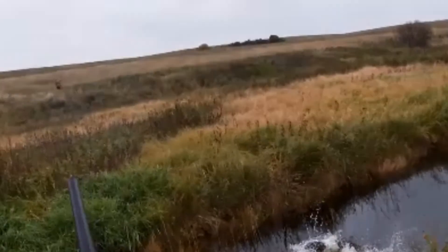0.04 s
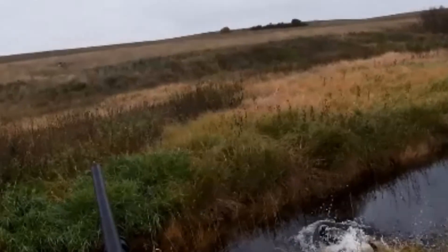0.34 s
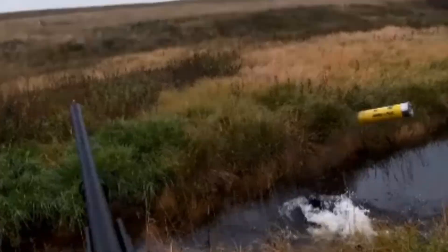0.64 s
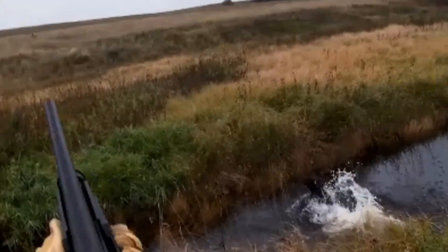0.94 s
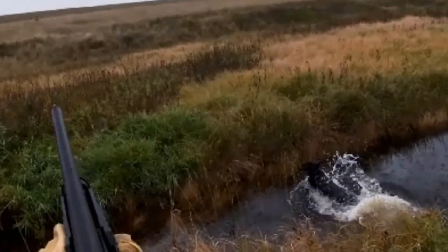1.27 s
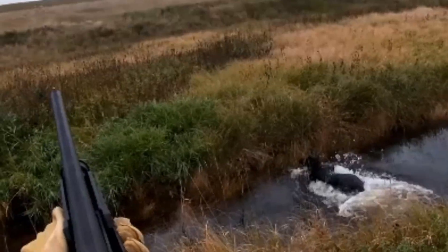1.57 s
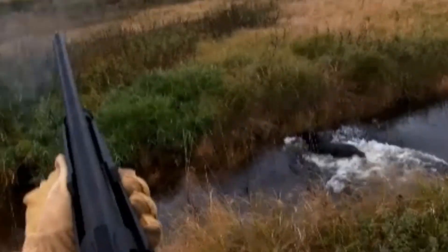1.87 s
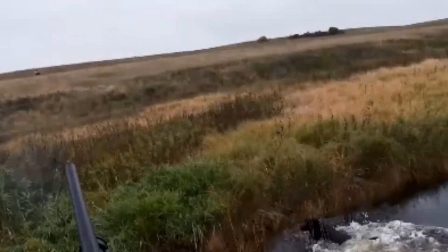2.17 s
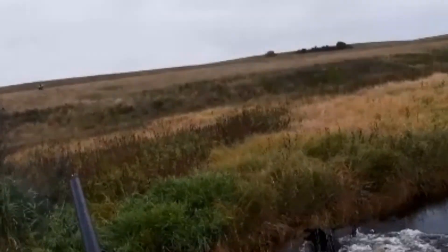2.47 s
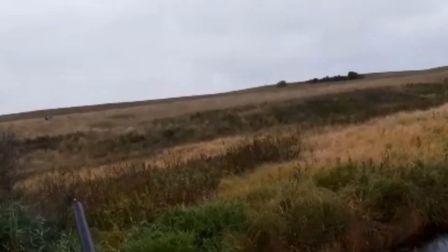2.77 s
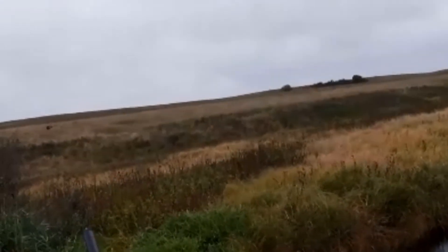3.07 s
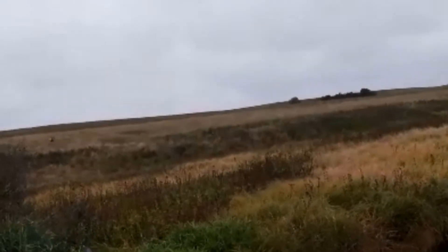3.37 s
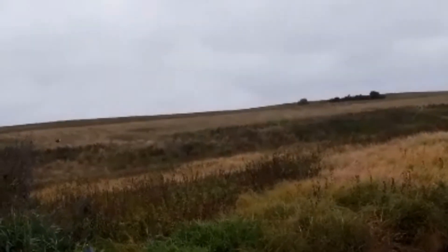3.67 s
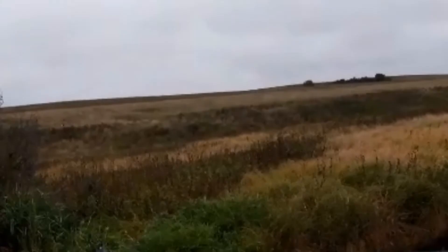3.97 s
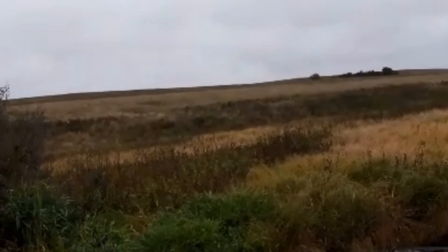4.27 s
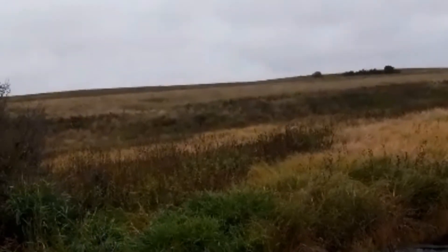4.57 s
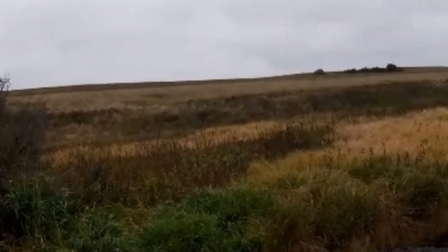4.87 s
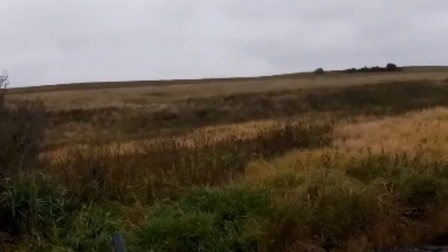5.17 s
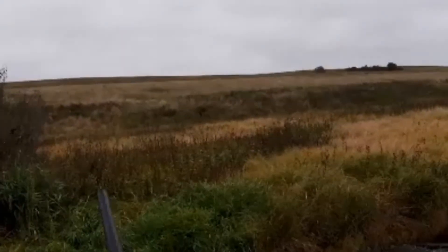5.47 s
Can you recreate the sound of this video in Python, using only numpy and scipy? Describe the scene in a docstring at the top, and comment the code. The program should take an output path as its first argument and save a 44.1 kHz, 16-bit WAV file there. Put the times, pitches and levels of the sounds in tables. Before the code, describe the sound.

Close shotgun pump clacks, one echoing blast and another quick rack in windy open grassland, with a dog faintly splashing.

```python
"""Open grassland above a creek: a pump shotgun is racked, fired and racked again beside a muffled camera.
The slide scrapes along its rails, knocks against its stops and leaves the steel ringing. Each shot is a
blast of noise that rolls back off the land, a hillside answering last; an earlier one is still dying away
at first. Recoil and slide thud through the camera, wind eddies buffet the microphone, and a dog
faintly churns up spray and bubbles in the creek below."""
import sys
import numpy as np
from scipy import signal
from scipy.fft import rfft, irfft, next_fast_len
from scipy.io import wavfile
from scipy.ndimage import uniform_filter1d

SR = 44100
rng = np.random.default_rng(int(sys.argv[2]) if len(sys.argv) > 2 else 0)


def materialize(psi):
    """Save the field psi as 16-bit PCM at rate SR to the path in sys.argv[1].

    A 1-D psi becomes a single channel; in a 2-D psi each row is a channel.
    """
    bounded = np.clip(np.atleast_2d(psi).T, -1, 1)
    quanta = np.round(bounded * 32767).astype(np.int16)
    wavfile.write(sys.argv[1], SR, quanta)


N = 243643
T = np.arange(N) / SR
HZ = np.fft.rfftfreq(next_fast_len(N, True), 1 / SR)
MODE_WIDTH_HZ = 78  # width of the peaks that a contact picks out
CONTACT_S, LEAD_S = 0.0014, 0.012  # attack of steel on steel; pre-roll ahead of each knock

# The wind bed, with one deep lull. Each row: time in seconds, rumble in dB, buffeting in dB.
BREEZE = [(0, -41, -38.5), (.45, -40, -47.5), (.85, -43, -42), (1.15, -33, -48.5), (1.35, -47.5, -51.5),
          (2.1, -32.5, -39), (2.32, -39, -53), (2.6, -35, -36.5), (2.85, -48.5, -51.5), (3.1, -34, -38),
          (3.42, -35, -55.5), (3.7, -45, -70), (3.95, -40.5, -68.5), (4.05, -60.5, -78), (4.25, -52.5, -64),
          (4.35, -47, -50), (5.15, -36.5, -46.5), (5.52, -51.5, -50.5)]
# Gusts thumping the microphone. Each row: peak in seconds, rumble in dB, buffeting in dB,
# length in seconds.
GUSTS = [(0.063, -48, -29.5, 0.036), (0.234, -31, -46, 0.08), (1.034, -23.5, -35.5, 0.17),
         (1.082, -46, -29.5, 0.033), (1.289, -30.5, -37, 0.018), (1.407, -31.5, -39, 0.024),
         (1.491, -34, -34, 0.071), (1.668, -38.5, -28, 0.026), (2.174, -37, -39, 0.052),
         (2.431, -28.5, -23, 0.034), (2.524, -33, -35.5, 0.15), (3.079, -40, -25.5, 0.026),
         (3.232, -24.5, -37.5, 0.045), (3.559, -36.5, -40.5, 0.15), (3.824, -33, -73.5, 0.027),
         (4.373, -38, -36.5, 0.12), (4.667, -36, -49.5, 0.15), (4.748, -37, -28, 0.03),
         (5.05, -27, -42.5, 0.034), (5.096, -35, -38.5, 0.044)]
# EQ curves of the large and the small eddies. Each row: frequency in Hz, gain in dB.
RUMBLE_EQ = [(8, -4.5), (22, 9), (45, 3.5), (68, -0.5), (92, -31.5), (200, -64), (500, -96.5), (2000, -130)]
BUFFET_EQ = [(40, -18), (85, 6.5), (110, 2.5), (165, -10), (210, -16), (300, -31.5), (500, -45.5),
             (1200, -84.5), (4000, -120)]
# Hollow hums in the wind. Each row: peak in seconds, pitch in Hz, level in dB, length in seconds.
HUMS = [(2.705, 235, -53, 0.1), (2.708, 403, -60, 0.11), (2.81, 231, -55.5, .06), (2.94, 226, -48, 0.066),
        (2.962, 400, -66.5, .07), (3.086, 309, -54.5, 0.031), (3.205, 227, -52.5, .11),
        (3.38, 230, -63, .06), (3.82, 222, -63, .06), (3.936, 230, -59, 0.068), (4.239, 222.5, -59.5, 0.12),
        (4.437, 251, -48.5, 0.043), (4.671, 388, -49.5, 0.11), (4.829, 426, -58, 0.13)]
# The dog's churning, fainter as it swims behind the bank. Each row: time in seconds, level in dB.
CHURN = [(0, -49), (.2, -47.5), (.28, -56), (.5, -63), (1.3, -61.5), (1.75, -58), (2.3, -62.5), (2.47, -69),
         (2.65, -66), (2.95, -71), (4.35, -70.5), (4.5, -67.5), (5.52, -60)]
# Splashes poking out of the churn. Each row: peak in seconds, level in dB, length in seconds.
SPLASHES = [(0.28, -67, .008), (0.34, -54.5, 0.027), (1.411, -64.5, 0.051), (1.625, -68, 0.093),
            (2.588, -60.5, 0.027), (2.705, -62.5, .025), (3.33, -68, 0.083), (3.45, -68.5, 0.044),
            (3.602, -68, 0.049), (4.48, -66, 0.067), (4.684, -67.5, 0.0077), (4.895, -62.5, 0.027),
            (4.952, -60.5, 0.059)]
# EQ curves of the water, the cloth and the ticks. Each row: frequency in Hz, gain in dB.
WATER_EQ = [(90, -15.5), (190, -12), (240, -3.5), (320, -9.5), (410, -10), (650, -14.5), (1000, -16),
            (1360, -16.5), (1750, -23), (2400, -23.5), (3000, -23), (3500, -32.5), (4300, -35.5),
            (4800, -49.5), (5700, -46.5), (6500, -55.5), (8500, -85.5)]
CLOTH_EQ = [(300, -23.5), (1000, -4.5), (1800, 2.5), (3000, 4.5), (4200, -10.5), (5000, -23), (6000, -21.5),
            (8000, -55)]
TICK_EQ = [(2000, -22.5), (5000, -16), (8000, -3.5), (9500, 0), (10300, 6.5), (11000, -22)]
# The rustle as the gun is lowered. One row: peak in seconds, level in dB, length in seconds.
RUSTLE = (3.985, -73, 0.3)
# Dry ticks in the top end. Each row: time in seconds, level in dB.
TICKS = [(.533, -61), (.618, -51), (.703, -49.5), (0.789, -60), (.917, -58), (1.002, -45.5), (1.087, -59),
         (1.172, -57.5), (1.513, -63.5), (1.813, -61), (1.855, -47.5), (1.94, -48.5), (1.985, -51.5),
         (2.068, -55), (2.11, -59), (2.238, -61.5), (2.408, -55.5), (2.452, -52.5), (2.537, -52),
         (2.58, -61.5), (2.707, -62), (3.006, -55), (3.134, -53), (3.177, -61.5), (3.219, -59.5),
         (3.603, -58), (3.816, -59), (4.37, -59.5), (4.669, -58.5), (4.754, -55), (4.968, -58),
         (5.181, -61), (5.266, -56), (5.309, -51), (5.352, -48.5)]
# Jolts through the shooter's body. Each row: peak in seconds, thud in dB, length in seconds,
# low-pass corner in Hz, boom of the stock in dB.
JOLTS = [(0.623, -33.5, 0.011, 80, -32), (0.65, -21, 0.052, 58, -36.5), (0.793, -43.5, .035, 80, -40),
         (0.993, -33, 0.033, 50, -41.5), (1.903, -12.5, 0.043, 54.8, -28),
         (1.977, -22.5, 0.07, 30.86, -38.5), (5.326, -43, .06, 80.5, -38), (5.373, -18.5, 0.017, 92, -35)]
# Steel shimmer after the action closes. Each row: start in seconds, level in dB, t60 in seconds.
SHIMMERS = [(.985, -51.5, 0.55), (5.365, -52.5, 0.65)]
# EQ curves of that shimmer and of the gun's steel and stock. Each row: frequency in Hz, gain in dB.
SHIMMER_EQ = [(600, -24.5), (1500, -7.5), (2800, 1.5), (3700, -4), (4400, -15.5), (5700, -18), (6500, -23),
              (7500, -44)]
GUN_EQ = [(120, -36.5), (250, -13.5), (390, -8), (520, -8.5), (650, -2), (850, -2.5), (1400, -5.5),
          (2300, -12), (3000, -9.5), (3350, -19), (3650, -14), (4150, -28.5), (5000, -34), (6200, -37.5),
          (7000, -49), (8500, -65)]
# Resonances of the gun. Each row: centre in Hz, width in Hz, boost in dB.
GUN_MODES = [(470, 130, 3), (1080, 77, -5), (2303, 98, -2.5), (3100, 130, 2.5), (3700, 120, 0),
             (4500, 330, 9.5), (5546, 380, 3)]
# Steel singing on after the slide stops. Each row: start in seconds, pitch in Hz, level in dB,
# t60 in seconds.
STEEL_NOTES = [(.984, 1990, -52, .26), (0.985, 2616, -58.5, 0.54), (0.986, 3337, -58, 0.78),
               (0.986, 3530, -56, 0.58), (0.984, 4762, -58, 0.42), (5.365, 1496, -57, 0.97),
               (5.365, 3000, -61, 0.36), (5.365, 3740, -57, .75)]
# Strokes of the slide. Each row: start and stop in seconds, level at the stop in dB, rattle t60 in
# seconds, rail pitch at the start and at the stop in Hz, rail level against the grit in dB.
STROKES = [(0.538, 0.648, -27, 0.23, 3075, 2960, -9.5), (0.763, 0.801, -50, 0.54, 3120, 3080, -7.5),
           (0.885, 0.912, -33, 0.15, 3113, 2620, -7.5), (0.96, 0.986, -25.5, 0.12, 2750, 2803, -4.5),
           (5.203, 5.262, -35.5, .11, 2450, 1990, -5), (5.293, 5.312, -32.5, .15, 2054, 2500, -0.5),
           (5.312, 5.366, -25, .12, 1500, 1886, -1.5)]
# Knocks of the gun as it is racked and handled, and sharp cracks within the blast. Each row: time in
# seconds, level in dB, ring pitch in Hz, relative ring level in dB, treble tilt in dB, t60 in seconds.
KNOCKS = [(.549, -31.5, 827, 6.5, 2, 0.043), (0.5562, -24, 1235, 4.5, -0.5, 0.015),
          (0.5835, -29.5, 1605, -4, 2.5, 0.043), (0.6, -25.5, 1490, 4.5, 2, 0.028),
          (.615, -28, 964, -24, 10, 0.065), (0.6495, -16.5, 493, -2.5, 0, 0.062),
          (.685, -23.5, 765, 3, -1.5, 0.023), (0.693, -22.5, 1090, 2, -1.5, 0.051),
          (0.716, -31.5, 795, 6.5, 0, 0.028), (0.7241, -33, 1110, -2.5, -3, 0.066),
          (0.7575, -37.5, 1290, -2, 1.5, 0.03), (0.81, -43, 1030, -1, 2, 0.039),
          (0.8189, -36, 950, -7, -8, 0.05), (0.859, -41, 1320, -11, 8, 0.044),
          (.902, -22.5, 1026, -9, 4.5, .05), (.956, -21, 3110, 3, -1, 0.029),
          (.982, -18.5, 1244, 4.5, 3, 0.07), (.992, -16.5, 553, -0.5, -2.5, 0.027),
          (1.875, -21, 1335, 7, 0, 0.063), (1.89, -19, 514, -3.5, 5, 0.062),
          (1.903, -18.5, 587, -6, 0.5, 0.083), (3.241, -60.5, 814, -5.5, -8.5, 0.024),
          (3.956, -63.5, 2950, -6.5, -1, 0.021), (3.974, -65, 1740, 10, -1, 0.015),
          (3.989, -65, 3310, -8, 17, .03), (4.175, -51.5, 916, -10.5, -9.5, 0.027),
          (4.796, -65, 4130, -4, -1.5, .04), (5.074, -50, 1164, 4, -14, 0.03),
          (5.208, -27.5, 1350, 4, -5, 0.027), (5.2391, -28.5, 905, -3, 0, 0.052),
          (5.251, -23.5, 787, 2.5, -3, 0.095), (5.286, -25, 1155, -2.5, -5, 0.043),
          (5.3065, -23.5, 1263, -6, -6, 0.088), (5.325, -24.5, 1376, 8.5, 3.5, 0.049),
          (5.343, -24.5, 1777, -6, 5, 0.12), (5.354, -27.5, 1750, -12, 5.5, 0.06),
          (5.365, -14, 523, -0.5, 0.5, 0.054), (5.399, -36.5, 2240, 3.5, 3, 0.052)]
# A hollow swell just before each shot. Each row: centre in Hz, width in Hz, relative level in dB.
SWELL_BANDS = [(179.5, 50, -3), (398.5, 74, -6), (536, 140, -1), (810, 190, -2), (980, 120, -4),
               (1550, 76, 2.5), (2049, 150, 0.5), (2414, 110, -12), (2728, 400, -6), (2990, 170, -2),
               (3915, 320, -13), (4290, 220, -13.5), (5500, 740, -28.5), (6497, 400, -39)]
# EQ curve of the shot's roar. Each row: frequency in Hz, gain in dB.
REPORT_EQ = [(88, -22), (160, -12), (310, -14.5), (540, -13.5), (1000, -15.5), (1450, -16), (1750, -19.5),
             (2400, -17.5), (3000, -16.5), (3400, -26), (4200, -28), (4900, -41), (6200, -47), (7000, -55),
             (8500, -77.5)]
# The direct blast, then its echoes off water, creek bank, grass slope, far rise and hillside.
# Each row: delay in seconds, level in dB, attack in seconds, t60 in seconds, treble corner in Hz,
# midrange boost in dB.
SHOT_PATHS = [(.01, -18, 0.0055, 0.12, 8370, 3), (0.042, -20, .008, .075, 4000, 2),
              (0.111, -26, 0.049, 0.45, 5400, -2), (0.269, -43, 0.034, 1, 4860, 1.5),
              (.51, -50.5, 0.21, 0.21, 4500, -2), (0.512, -37, 0.019, 0.079, 1640, 5.5)]
# The shots, the first fired before the scene opens. Each row: time in seconds, level in dB.
SHOTS = [(-.348, 1), (1.87, 0.5)]


def gain_of(db):
    """Decibels to amplitude."""
    return 10 ** (np.asarray(db) / 20)


def unit_rms(x):
    """Scales to an rms of one."""
    return x / np.sqrt(np.mean(x ** 2) + 1e-20)


def eq_db(points, hz=HZ):
    """An EQ curve in dB, its points joined on a log-frequency axis."""
    point_hz, db = np.transpose(points)
    return np.interp(np.log(hz + 1), np.log(point_hz + 1), db)


def fader(curve, column=1):
    """Rides one dB column of a table, giving a gain for every sample."""
    rows = np.array(curve)
    return gain_of(np.interp(T, rows[:, 0], rows[:, column]))


def colour(x, db):
    """Filters a whole track by a gain in dB per bin; rms one."""
    size = next_fast_len(N, True)
    return unit_rms(irfft(rfft(x, size) * gain_of(db), size)[:N])


def noise(db):
    """White noise through an EQ; rms one."""
    return colour(rng.standard_normal(N), db)


def steadied(x, seconds):
    """Levels out the slow swell of a noise, leaving its fine grain."""
    power = abs(uniform_filter1d(x ** 2, max(int(seconds * SR), 8)))
    return x / np.sqrt(power + 1e-9)


def wobble(rate_hz):
    """Random movement up to about the given rate; rms one."""
    return noise(-10 * np.log10(1 + (HZ / rate_hz) ** 8))


def noise_band(hz, width_hz):
    """A steady band of noise: a rough, wavering note."""
    band = noise(-10 * np.log10(1 + (2 * (HZ - hz) / width_hz) ** 6))
    return steadied(band, 1 / width_hz)


def ripple(hz=HZ):
    """Random peaks and dips along a spectrum, rms one, so that no two hits share a colour."""
    peak = np.hanning(int(2 * MODE_WIDTH_HZ / hz[1]) + 3)
    return unit_rms(signal.fftconvolve(rng.standard_normal(len(hz)), peak, "same"))


def grains(per_s, spread_db):
    """Random clicks; more spread makes a few jump out."""
    size = gain_of(spread_db * np.minimum(rng.exponential(1, N), 4))
    return unit_rms(size * rng.standard_normal(N) * (rng.random(N) < per_s / SR))


def swell(s, length):
    """A rounded rise and fall about a moment."""
    return np.exp(-(2 * (T - s) / length) ** 2)


def burst(s, attack, t60):
    """An envelope that climbs to a moment and dies after it."""
    return np.exp(np.minimum(T - s, 0) / attack) * gain_of(-60 * np.maximum(T - s, 0) / t60)


def add(mix, s, sound):
    """Mixes a sound in at a time."""
    part = mix[max(round(s * SR), 0):][:len(sound)]
    part += sound[:len(part)]


def wind(buffet_db=-1, heave_db=1, flutter_db=3.0, eddy_hz=16):
    """Large eddies rumble; small ones buffet in quick lumps. Gusts ride on an uneven breeze."""
    rumble = steadied(noise(eq_db(RUMBLE_EQ)), 0.035)
    buffet = steadied(noise(eq_db(BUFFET_EQ)), 0.014)
    eddies = wobble(eddy_hz)
    large = fader(BREEZE) * gain_of(heave_db * eddies)
    small = fader(BREEZE, column=2) * gain_of(flutter_db * eddies)
    for s, large_db, small_db, length in GUSTS:
        gust = swell(s, length)
        large = np.hypot(large, gain_of(large_db) * gust)
        small = np.hypot(small, gain_of(small_db) * gust)
    return rumble * large + gain_of(buffet_db) * buffet * small


def hums(width_hz=42):
    """Short, rough, hollow notes, barely above the wind."""
    return sum(gain_of(db) * noise_band(hz, width_hz) * swell(s, length) for s, hz, db, length in HUMS)


def dog_in_creek(bubble_db=-7, slosh_db=0.8, slosh_hz=12):
    """Churned water: a sloshing wash of spray and small bubbles that rise in pitch as they die."""
    t, bubbles = T[:2048], np.zeros(N)
    for hz in np.geomspace(450, 4200, 24):
        bubble = np.sin(2 * np.pi * hz * t * (1 + 3 * t)) * np.exp(-t * hz / 5)
        stream = signal.oaconvolve(grains(per_s=34, spread_db=1.8), bubble)[:N]
        bubbles += unit_rms(stream) * hz ** 0.2
    water_db = eq_db(WATER_EQ)
    spray = colour(grains(per_s=6800, spread_db=2.5), water_db)
    splashes = sum(gain_of(db) * swell(s, length) for s, db, length in SPLASHES)
    churn = fader(CHURN) * gain_of(slosh_db * wobble(slosh_hz))
    return np.hypot(churn, splashes) * (spray + gain_of(bubble_db) * colour(bubbles, water_db))


def cloth_rustle():
    """Cloth brushes past the camera in fine grains."""
    s, db, length = RUSTLE
    return gain_of(db) * swell(s, length) * colour(grains(per_s=5000, spread_db=0), eq_db(CLOTH_EQ))


def ticks(trim_db=3, size=256):
    """Thin, dry ticks, each a single bright click."""
    tone = gain_of(eq_db(TICK_EQ, np.fft.rfftfreq(size, 1 / SR)))
    click = np.roll(irfft(tone), size // 2)
    out = np.zeros(N)
    for s, db in TICKS:
        add(out, s - size / 2 / SR, gain_of(db + trim_db) * click / click.max())
    return out


def field_reverb(x, wet_db=-31, t60=0.18):
    """Grass and banks scatter a faint tail back."""
    t = T[:SR]
    tail = rng.standard_normal(len(t)) * gain_of(-60 * t / t60) * (1 - np.exp(-t / 0.01))
    return x + gain_of(wet_db) * signal.fftconvolve(x, tail / np.linalg.norm(tail))[:N]


def jolts(low_cut_hz=18, high_cut_hz=380):
    """Recoil and the slamming slide shake the camera: deep thuds with a hollow boom above them."""
    out = np.zeros(N)
    boom = noise_band(hz=180, width_hz=250)
    band_loss = (1 + (HZ / high_cut_hz) ** 6) * (1 + (low_cut_hz / (HZ + 1)) ** 4)
    for s, db, length, corner_hz, boom_db in JOLTS:
        loss = (1 + (HZ / corner_hz) ** 2) * band_loss
        thud = steadied(noise(-10 * np.log10(loss)), 0.013)
        out += (gain_of(db) * thud + gain_of(boom_db) * boom) * swell(s, length)
    return out


def steel_shimmer():
    """Countless thin modes of the steel die away together under its few clear notes."""
    modes = noise(eq_db(SHIMMER_EQ))
    return modes * sum(gain_of(db) * burst(s, CONTACT_S, t60) for s, db, t60 in SHIMMERS)


def steel_ring(twin_db=-11.5, buzz_depth=0.33, buzz_hz=70):
    """Each steel note beats against a weaker twin close by, and loose parts make it buzz."""
    t, steel = T[:SR], np.zeros(N)
    for s, hz, db, t60 in STEEL_NOTES:
        beat_hz = 7.1 * rng.uniform(0.26, 1.3)
        twin = gain_of(twin_db) * np.sin(2 * np.pi * ((hz + beat_hz) * t + rng.random()))
        add(steel, s, gain_of(db - 60 * t / t60) * (np.sin(2 * np.pi * hz * t) + twin))
    return steel * (1 + buzz_depth * wobble(buzz_hz))


def gun_body_db(hz):
    """The body of the gun: a broad slope shaped by its resonances."""
    resonances = sum(db / (1 + (2 * (hz - centre) / width) ** 2) for centre, width, db in GUN_MODES)
    return eq_db(GUN_EQ, hz) + resonances


def slide_scrape(trim_db=-1, ripple_db=3.5, rail_width_hz=400, grip_db_per_s=537, speedup_db_per_s=124):
    """The slide bites, grinds louder as it gathers speed, then rattles out; one rail's note glides."""
    out = np.zeros(N)
    for start, stop, db, t60, start_hz, stop_hz, rail_db in STROKES:
        friction = 0.5 * rng.standard_normal(N) + 0.5 * grains(per_s=2500, spread_db=2.5)
        grit = steadied(colour(friction, gun_body_db(HZ) + ripple_db * ripple()), 0.021)
        cycles = np.cumsum(np.interp(T, [start, stop], [start_hz, stop_hz])) / SR
        rail = unit_rms(wobble(rail_width_hz / 2) * np.sin(2 * np.pi * cycles))
        grip_db = grip_db_per_s * np.minimum(T - start, 0)
        speed_db = speedup_db_per_s * (np.clip(T, start, stop) - stop)
        decay_db = -60 * np.maximum(T - stop, 0) / t60
        out += (grit + gain_of(rail_db) * rail) * gain_of(trim_db + db + grip_db + speed_db + decay_db)
    return out


def knock(ring_hz, ring_db, treble_db, t60, crack_db=3, ripple_db=5.5, size=8192):
    """One hard hit: a crack, a dense cluster of dying modes and a single ringing note."""
    t, hz = np.arange(size) / SR - LEAD_S, np.fft.rfftfreq(size, 1 / SR)
    decay_db = -60 * np.maximum(t, 0) / t60
    tilt_db = treble_db * np.tanh(np.log(hz / 1800 + 1e-6) * 2)  # pivots at 1800 Hz
    tone = gain_of(gun_body_db(hz) + tilt_db + ripple_db * ripple(hz))
    pulse = np.roll(irfft(tone), round(LEAD_S * SR))
    crack = gain_of(crack_db) * pulse / abs(pulse).max()
    modes = irfft(tone * np.exp(2j * np.pi * rng.random(len(hz))))
    cluster = steadied(modes, 0.033) * gain_of(decay_db)
    note = gain_of(ring_db + decay_db / 0.95) * np.sin(2 * np.pi * ring_hz * t)  # dies a touch sooner
    attack = np.exp(np.minimum(t, 0) / CONTACT_S)
    return crack + (cluster + note) * attack


def knocks_and_cracks(trim_db=-1):
    """Parts knock together as the gun is racked and handled; sharp cracks cut through the blast."""
    out = np.zeros(N)
    for s, db, *voicing in KNOCKS:
        add(out, s - LEAD_S, gain_of(db + trim_db) * knock(*voicing))
    return out


def pre_shot_swell(trim_db=-19.0, attack_s=0.024, t60=0.07):
    """A short, hollow, ringing swell of noise bands heard just before each shot."""
    out = np.zeros(N)
    bands = unit_rms(sum(gain_of(db) * noise_band(hz, width) for hz, width, db in SWELL_BANDS))
    for s, shot_db in SHOTS:
        gate = np.clip((T - s + 0.073) / 0.046, 0, 1)
        out += gain_of(trim_db + shot_db) * bands * burst(s, attack_s, t60) * gate
    return out


def shot_roar(ripple_db=0.76, mid_hz=650):
    """The direct blast and each echo is a roaring burst in its own colour, the hillside's the dullest."""
    out = np.zeros(N)
    mids = np.exp(-np.log((HZ + 1) / mid_hz) ** 2)  # the octaves that the ground lifts or scoops
    for delay, db, attack, t60, corner_hz, mid_db in SHOT_PATHS:
        path_db = mid_db * mids - 10 * np.log10(1 + (HZ / corner_hz) ** 4)
        roar = steadied(noise(eq_db(REPORT_EQ) + path_db + ripple_db * ripple()), 0.02)
        for s, shot_db in SHOTS:
            gate = np.clip((T - s) / 0.064 + 1, 0, 1)  # opens just ahead of the shot
            out += gain_of(db + shot_db) * burst(s + delay, attack, t60) * roar * gate
    return out


def scene():
    """Gun up front, wind and water behind, all at one microphone."""
    close_up = field_reverb(knocks_and_cracks() + slide_scrape() + steel_ring())
    foreground = close_up + shot_roar() + pre_shot_swell() + jolts()
    return (foreground + wind() + hums() + dog_in_creek() + cloth_rustle() + steel_shimmer())[None]


def record(dry, hiss_db=-97.0, muffle_hz=7300, band_limit_hz=10600):
    """The housing muffles the treble; faint ticks and hiss lie on top, then a steep high cut."""
    muffled = signal.sosfilt(signal.butter(8, muffle_hz, fs=SR, output="sos"), dry)
    hissy = muffled + ticks() + gain_of(hiss_db) * rng.standard_normal(dry.shape)
    high_cut = signal.firwin(255, band_limit_hz, window=("kaiser", 8), fs=SR)
    return signal.oaconvolve(hissy, high_cut[None], "same")


dry = scene()
out = record(dry)
materialize(out)
```